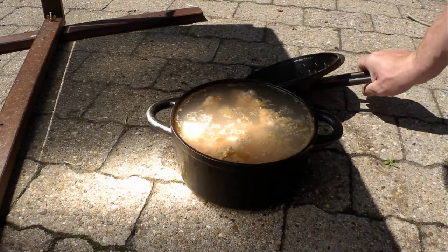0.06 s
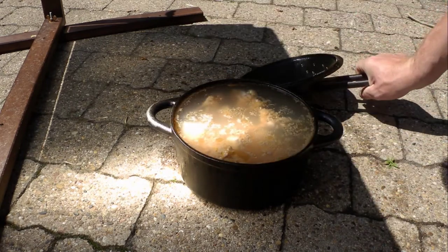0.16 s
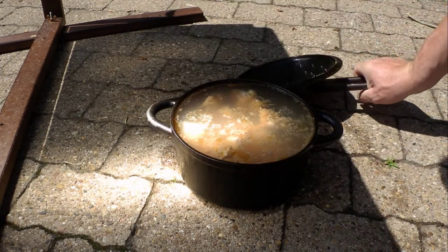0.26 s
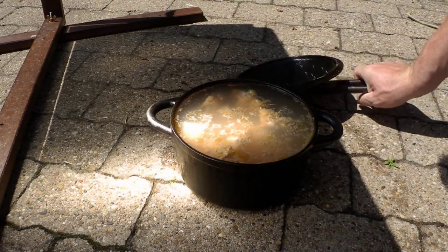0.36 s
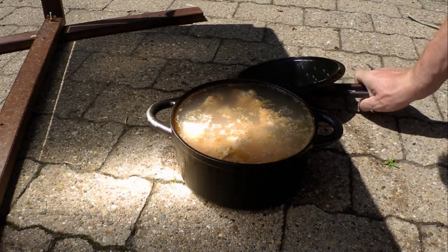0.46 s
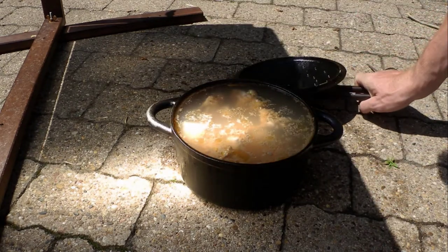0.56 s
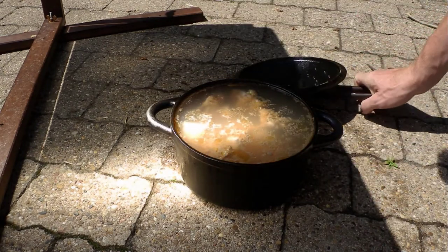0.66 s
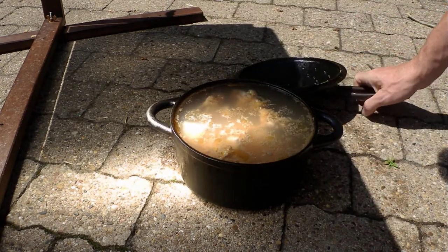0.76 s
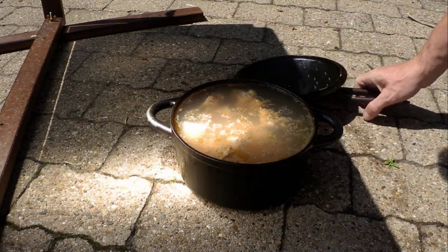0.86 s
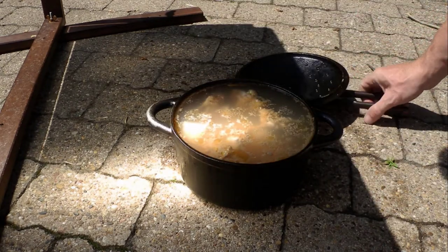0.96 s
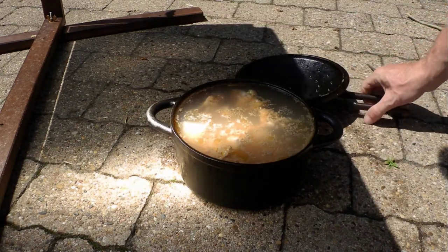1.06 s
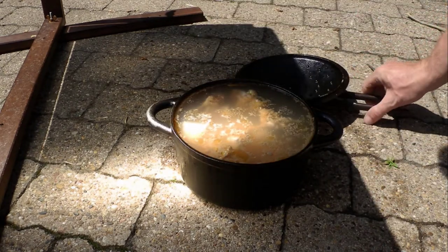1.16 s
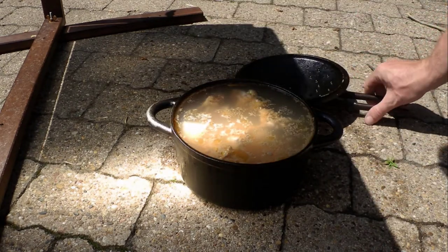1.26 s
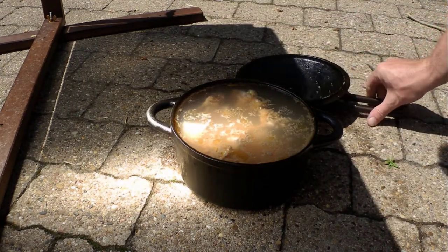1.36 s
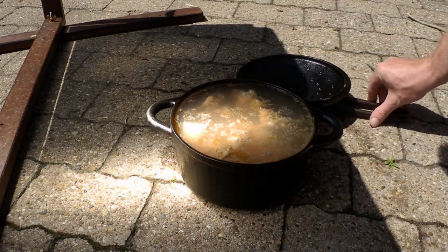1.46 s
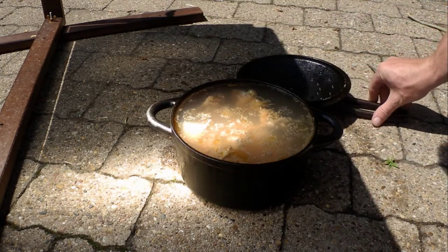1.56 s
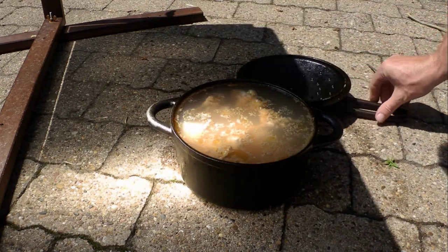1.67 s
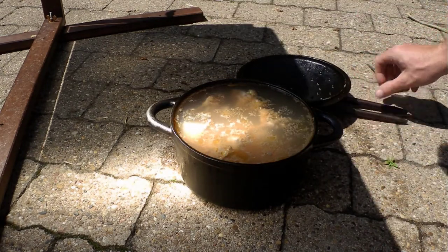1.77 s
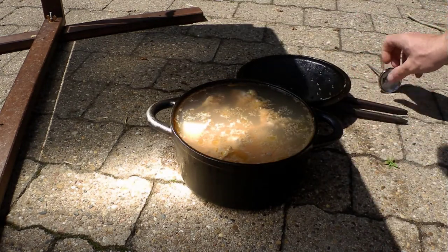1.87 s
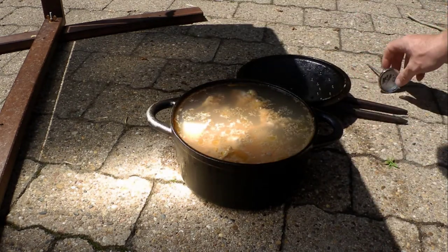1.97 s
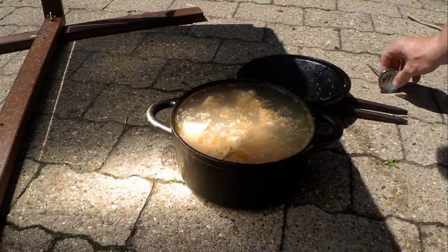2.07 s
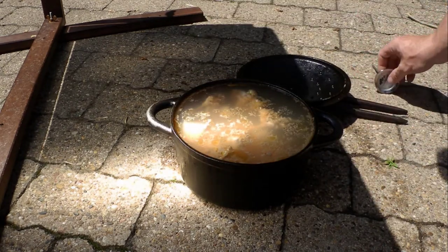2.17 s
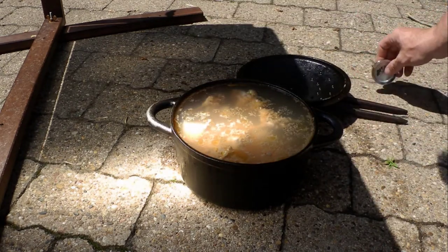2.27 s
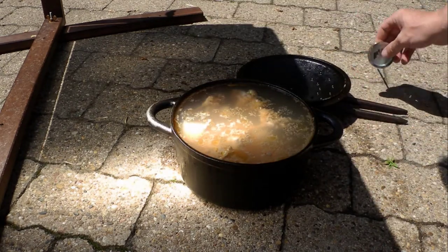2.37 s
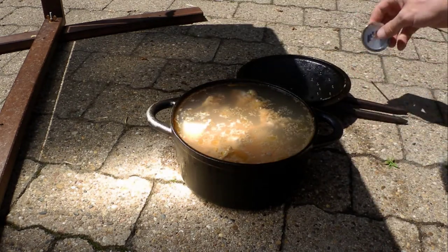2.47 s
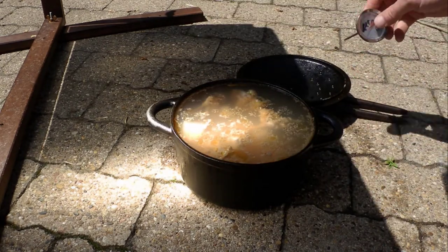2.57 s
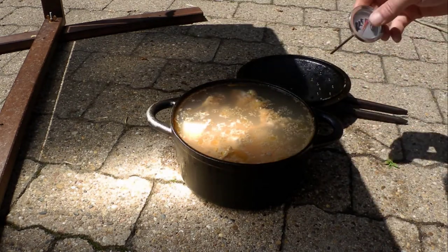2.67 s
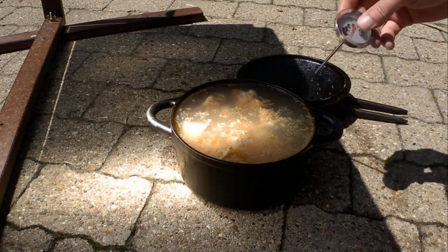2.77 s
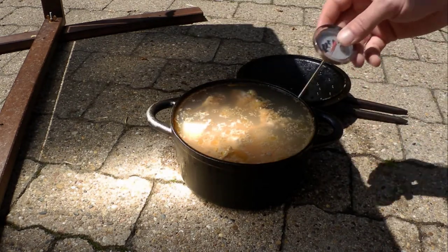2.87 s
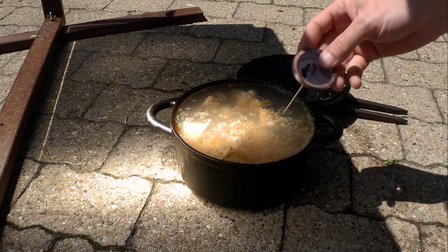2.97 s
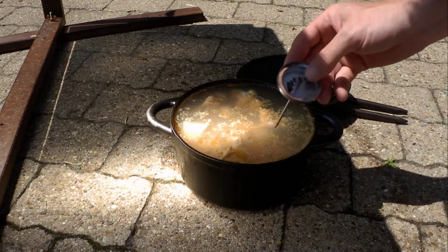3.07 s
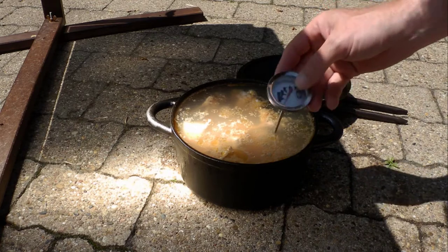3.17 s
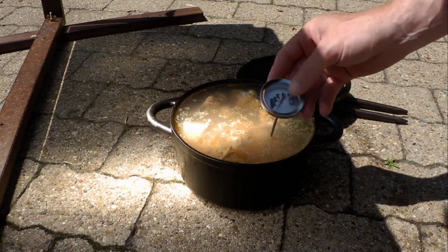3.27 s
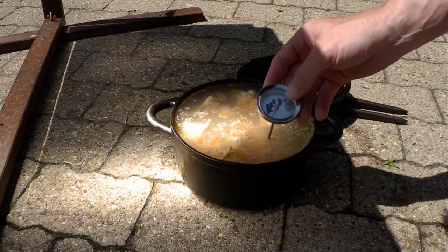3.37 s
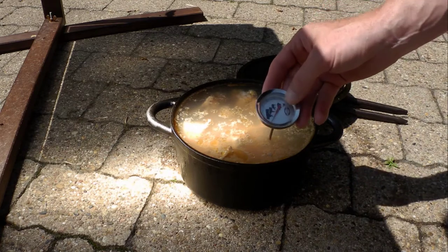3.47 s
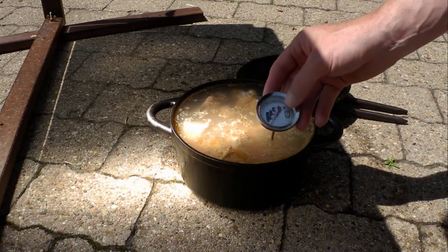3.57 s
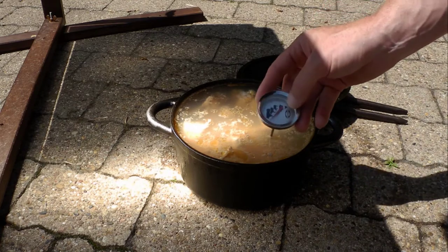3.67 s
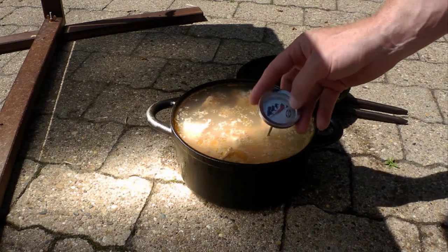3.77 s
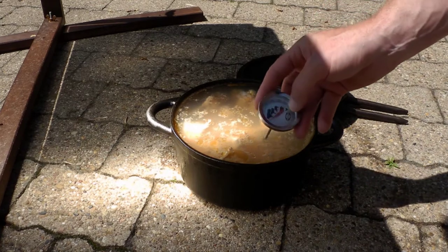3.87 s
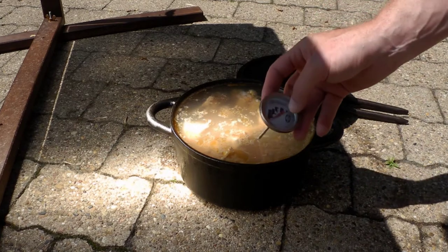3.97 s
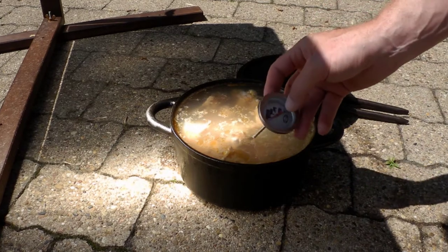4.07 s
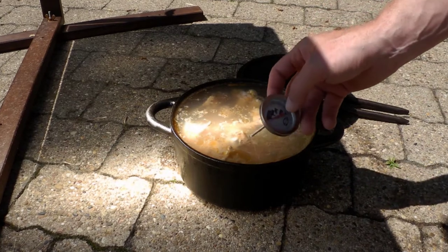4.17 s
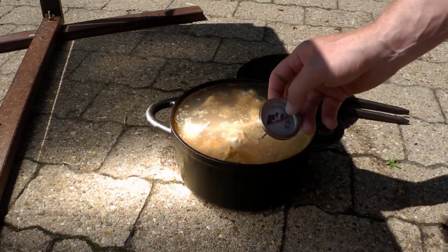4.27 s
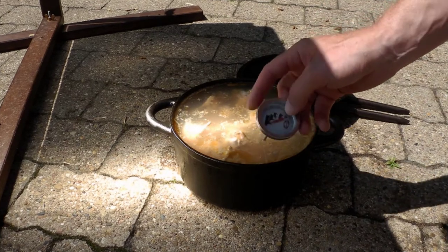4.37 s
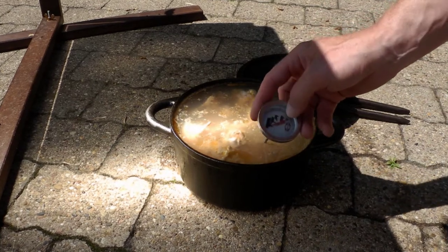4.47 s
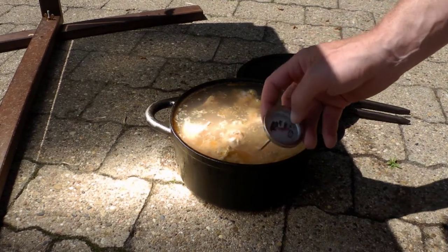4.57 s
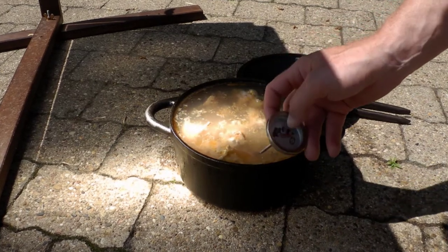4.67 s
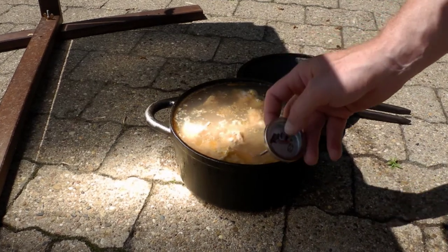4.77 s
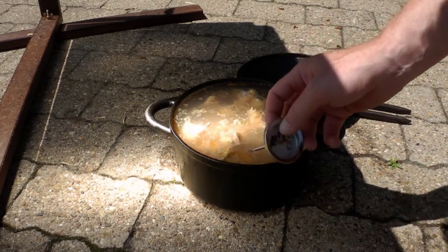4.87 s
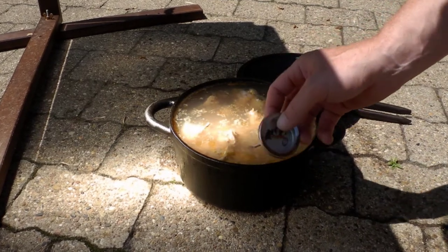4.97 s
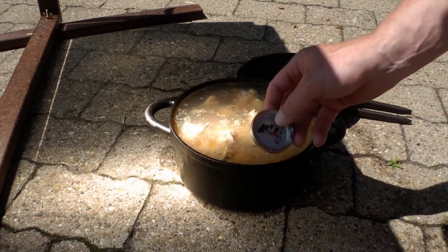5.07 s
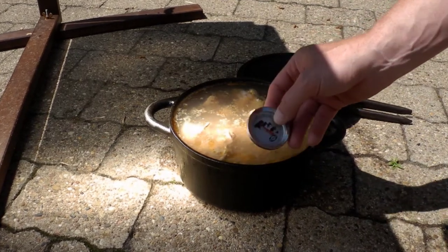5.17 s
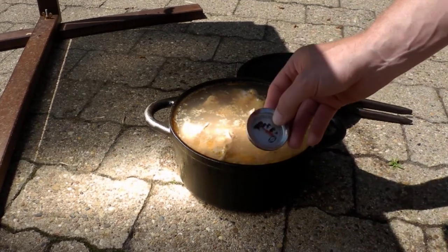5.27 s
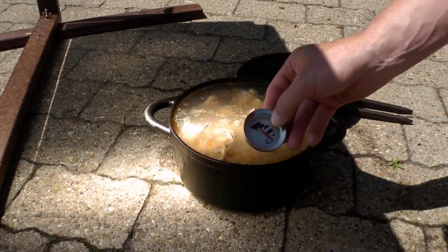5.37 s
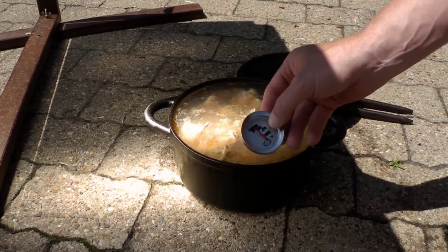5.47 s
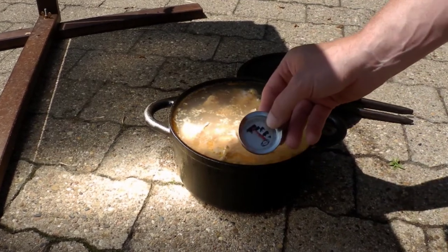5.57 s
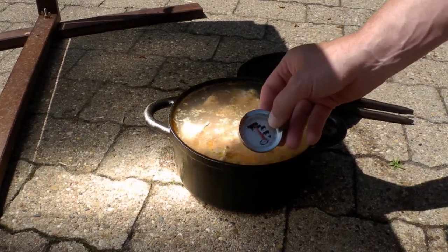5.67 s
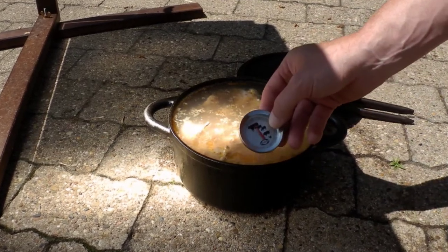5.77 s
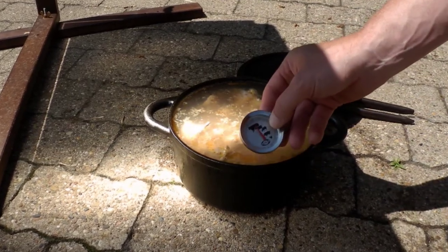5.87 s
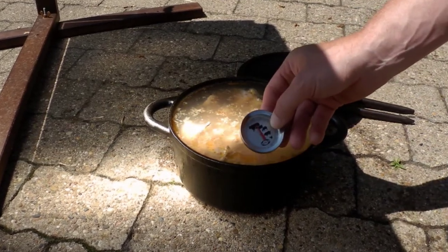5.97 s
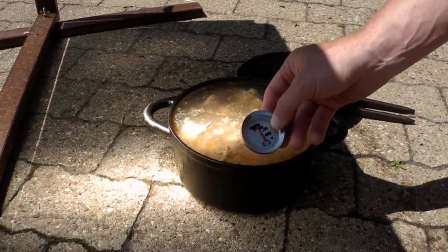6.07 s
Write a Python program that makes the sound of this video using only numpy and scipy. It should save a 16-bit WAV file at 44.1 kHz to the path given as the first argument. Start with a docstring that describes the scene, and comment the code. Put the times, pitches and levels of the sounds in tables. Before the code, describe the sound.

In a quiet yard, a pan's hollow knock and short scrape come first, followed by faint contacts and a hard ringing slap onto paving. A tight jingling chatter of a small metal case comes next, then delicate high taps and singing steel scrapes on a pot. Distant bird notes recur throughout. Stereo, close microphone, with steady low rumble, hiss that swells with the handling, and automatic level dips.

```python
"""Pan, pot and thermometer on paving

Outdoors, a metal pan is set down on paving beside a cooking pot: it knocks, scrapes and drops flat.
Struck metal is a sum of decaying modes with a noise burst at each contact; friction is many tiny slips.
A dial thermometer is picked up with a rattle, then its steel probe taps and slides on the pot's rim.
A small bird, made of gliding sines with a scattered tail, sings far off over rumble, hum and a hiss that
sinks and swells with the handling; grit snaps and soft low bumps are heard too.
A gain control ducks the sound when its treble is loud."""
import sys
import numpy as np
from scipy import signal
from scipy.fft import rfft, irfft, next_fast_len
from scipy.io import wavfile
from scipy.ndimage import uniform_filter1d, minimum_filter1d, map_coordinates

SR = 44100
rng = np.random.default_rng(int(sys.argv[2]) if len(sys.argv) > 2 else 0)


def put_to_file(sound):
    """Save the sound as 16-bit audio at rate SR, in the file named by the first command-line argument."""
    columns = np.atleast_2d(sound).T  # one column per channel
    safe = np.clip(columns, -1, 1)
    whole_steps = np.round(safe * 32767)
    wavfile.write(sys.argv[1], SR, whole_steps.astype(np.int16))


N = 269451
TIME = np.arange(N) / SR  # s
AGE = TIME[:SR // 2]  # time since a blow, s


def amp(db):
    """Logarithmic level: decibels to gain."""
    return 10 ** (np.asarray(db) / 20)


def unit(x):
    """Normalised power: x at rms 1."""
    return x / np.sqrt(np.mean(x ** 2) + 1e-20)


def unit_attack(x):
    """Onset loudness: a blow whose first hundredth of a second has rms 1."""
    return x / np.sqrt(np.mean(x[..., :SR // 100] ** 2))


def along(points, hz):
    """Logarithmic frequency scale: (Hz, value) points joined by straight lines on it."""
    f, v = np.transpose(points)
    return np.interp(np.log(hz + 1), np.log(f), v)


def level(rows):
    """Level envelope: gain per sample from (s, dB) rows."""
    return amp(np.interp(TIME, *np.transpose(rows)))


def wobble(rate):
    """Slow random modulation: a smooth curve through rate random knots a second."""
    knots = rng.standard_normal(int(N * rate / SR) + 4)
    return map_coordinates(knots, [TIME * rate])


def filtered(x, response):
    """Linear filtering: the spectrum of x times a response of frequency."""
    n = x.shape[-1]
    padded = next_fast_len(n + SR // 10)
    hz = np.fft.rfftfreq(padded, 1 / SR)
    return irfft(rfft(x, padded) * response(hz), padded)[..., :n]


def add(track, s, sound):
    """Superposition: mix a sound into a track at time s."""
    part = track[:, round(s * SR):][:, :sound.shape[-1]]
    part += sound[..., :part.shape[-1]]


def noise(spectrum, alike, size):
    """Partial coherence: coloured stereo noise of rms 1 whose mid and side shares set left-right likeness."""
    def mid_and_side(hz):
        angle = np.arccos(np.clip(along(alike, hz), -1, 1)) / 2
        return amp(along(spectrum, hz)) * [np.cos(angle), np.sin(angle)]

    mid, side = filtered(rng.standard_normal((2, size)), mid_and_side)
    return unit(np.array([mid + side, mid - side]))


def ringer(modes, lead, spread, scatter_db):
    """Modal vibration: each call rings an object's modes anew, each reaching the two ports out of step."""
    hz, db, t60 = np.transpose(modes)
    decays = amp(-60 * AGE / t60[:, None]) * np.exp(2j * np.pi * hz[:, None] * AGE)

    def ring():
        """Free decay: one blow's ring, roughened at the start by chatter."""
        port_phase = np.array([[.5], [-.5]]) * rng.normal(lead, spread, len(hz))
        phase = rng.uniform(0, 2 * np.pi, len(hz)) + port_phase
        strength = amp(db + scatter_db * rng.standard_normal((2, len(hz))))
        tones = np.einsum("cm,mt->ct", strength * np.exp(1j * phase), decays).real
        knots = AGE[::100]
        buzz = np.interp(AGE, knots, rng.standard_normal(len(knots)))
        # chatter against the support roughens the start of the ring
        chatter = .4 * np.exp(-AGE / .012)
        return unit_attack(tones * (1 + buzz * chatter))
    return ring


def crack(spectrum, t60, alike, tail_db, tail_t60, attack_s=0.0012):
    """Broadband impact: the burst of a hard contact and its faint scatter from the yard."""
    burst = noise(spectrum, [(1000, alike)], len(AGE)) * amp(-60 * AGE / t60)
    scatter = noise(spectrum, [(1000, .1)], len(AGE)) * amp(tail_db - 60 * AGE / tail_t60)
    return unit_attack((burst + scatter) * (1 - np.exp(-AGE / attack_s)))


def contact(x, hz, sharpness):
    """Contact stiffness: a springy contact favours its own resonance and passes little above it."""
    w = 2 * np.tan(np.pi * min(hz, SR / 2 - 1000) / SR)
    b, a = signal.bilinear([w * w], [1, w / sharpness, w * w])
    return signal.lfilter(b, a, x)


def stroke(s, rise, hold, fade_db):
    """Contact force envelope: one push rises, holds, then fades by fade_db a second."""
    attack = np.clip((TIME - s) / max(rise, 1 / SR), 0, 1)
    return attack * amp(-abs(fade_db) * np.maximum(TIME - s - rise - hold, 0))


def rub(pressure, ring, rate, grain_db, damping_db):
    """Stick-slip friction: tiny uneven slips, rate a second, excite modes that the contact damps."""
    spurts = amp(grain_db * np.tanh(wobble(40)))
    slips = (rng.random(N) < rate / SR) * rng.standard_normal(N) * spurts
    force = unit(slips) * pressure
    body = ring() * amp(-abs(damping_db) * AGE)
    return signal.fftconvolve(force[None], body / np.linalg.norm(body[0]), axes=1)[:, :N]


def lagged(x, lag):
    """Interaural-style delay: a sound from the right reaches the left port lag seconds later."""
    return filtered(x, lambda hz: np.exp(1j * np.pi * hz * lag * np.array([[-1], [1]])))


# Spectrum of the far outdoors. Each row: frequency in Hz, relative level in dB.
RUMBLE_COLOUR = [(15, -14), (33, -17), (54, 0.5), (75, -4.5), (190, -9.5), (400, -16.5), (600, -22),
                 (750, -20), (1920, -36.5), (2600, -41.5), (3400, -85)]
# Level of the rumble before its flutter and lean. Each row: time in seconds, level in dB.
RUMBLE_LEVEL = [(0, -44), (1.2, -43.5), (2.0, -45.5), (2.35, -43), (2.8, -43.5), (4.3, -45.5), (5.15, -43),
                (6.1, -45.5)]
# Coherence of the two ports. Each row: frequency in Hz, left-right likeness from 0 to 1.
LIKENESS = [(60, 0.85), (130, 0.96), (290, 0.82), (640, 0.63), (1410, 0.48), (3100, 0.039), (6820, 0.15),
            (15000, 1)]
# Spectrum of the hiss. Each row: frequency in Hz, relative level in dB.
HISS_COLOUR = [(1200, -41), (2500, 1.5), (4500, 7.5), (6500, 2.5), (9000, 5.5), (12000, 4), (15700, 1.5)]
# Level of the hiss and bright scrape noise: sinks after the pan's drop, swells as the probe rubs.
# Each row: time in seconds, level in dB, to which HISS_DB is added.
HISS_LEVEL = [(0.0, -54.5), (0.73, -58), (1.12, -52), (1.67, -66), (2.09, -65), (2.21, -58), (3.27, -52.5),
              (3.5, -58.5), (4.99, -54.5), (5.11, -49.5), (5.65, -56.5), (6.11, -59.5)]
HISS_DB = 2
HUM_HZ, HUM_DB = 52.6, -45.5  # centre pitch and level, both wavering


def background():
    """Ambient noise: rumble, frequency-modulated hum, light wind, a hiss that sinks and swells with the handling."""
    rumble = noise(RUMBLE_COLOUR, LIKENESS, N) * level(RUMBLE_LEVEL) * amp(0.2 * wobble(5.07))
    hum_hz = HUM_HZ + 2.26 * wobble(20)
    hum = np.sin(2 * np.pi * np.cumsum(hum_hz) / SR) * amp(HUM_DB + 0.69 * wobble(22.5))
    breeze_colour = [(15, 7), (60, -6), (200, 9), (600, -49), (1500, -120)]  # Hz, dB
    breeze = noise(breeze_colour, [(100, 0)], N) * amp(-66.0 + 3.7 * wobble(6.7))
    hiss = noise(HISS_COLOUR, LIKENESS, N) * level(HISS_LEVEL) * amp(HISS_DB)
    lean = amp([[.9], [-.9]])  # left, right
    return (rumble + hum) * lean + breeze + hiss


# Blows of the pan on the paving. Each row: start in seconds, push of air in dB, wall ring in dB,
# contact resonance in Hz, damping by the stone in dB/s.
PAN_HITS = [(.0597, -5, -26, 3620, 30), (0.082, -50, -39.5, 9100, 200), (.212, -19.5, -42, 3140, 50),
            (.460, -66, -38.5, 8000, 209), (.917, -29.5, -51.5, 7200, 300), (0.929, -38, -44.5, 3670, 300),
            (.952, -45, -49.5, 5500, 300), (1.2305, -46, -55, 10000, 400), (1.4825, -22.5, -33, 1980, 510),
            (1.489, -0.5, -19.5, 11000, 949), (1.4915, -29, -6.5, 5400, 653.5),
            (1.496, -32, -13, 5900, 800), (1.501, -23, -22.5, 8000, 10)]
# Modes of the pan's wall, before damping. Each row: frequency in Hz, relative level in dB, t60 in seconds.
WALL_MODES = [(2720, -6, .06), (2900, -8, .14), (3150, -8, .13), (3745, -3, .18), (3919, 0, .18),
              (4510, -7, .2), (4651, -10, .13), (4856, -11, .15), (5562, -2, .14), (5665, 0, .19),
              (5850, -7, .17), (6164, -12, .11), (6480, -13, .14), (7065, -5, .14), (7260, -10, .12),
              (8200, -11, .13), (8366, -10, .16), (8670, -6, .11), (8866, -5, .14), (10050, -7, .08),
              (10400, -10, .1), (11400, -15, .1), (11900, -7, .17), (14450, -14, .15)]
# Modes of its flat bottom, before damping. Each row: frequency in Hz, relative level in dB, t60 in seconds.
BOTTOM_MODES = [(160, -9, .15), (330, -9, .14), (522, -11, .09), (740, -3, .05), (880, 5, .08),
                (1080, -5, .06), (1340, -2, .17), (1440, -11, .08)]
# Spectrum of metal cracking on stone. Each row: frequency in Hz, relative level in dB.
PAN_CRACK = [(200, -22), (800, -12), (2000, -12), (4000, 8), (8000, 6), (16000, -1)]
# Drags of the pan's edge. Each row: start in seconds, length of the hold in seconds, level in dB.
DRAGS = [(.166, 0.028, -30.5), (0.191, 0.0057, -25.5), (0.457, 0.0048, -41)]
# Spectrum of the edge rasping on stone. Each row: frequency in Hz, relative level in dB.
DRAG_RASP = [(2000, -30), (5000, -8), (6000, 6), (7700, -10), (8900, 12), (10000, -20), (15000, -24)]
PUSH_S = 0.00026  # time scale of the swing of air under the pan
BOTTOM_DB, BOTTOM_GROWS = -14.5, 0.69  # bottom's ring at a blow of 0 dB; its dB per dB of blow
SETTLE_S, LASTING = 0.021, 0.19  # the bottom's ring drops quickly to a lasting share
PAN_CRACK_DB = 1  # against the mean dB of bottom and wall
DRAG_ATTACK_S, DRAG_FADE_DB_PER_S = 0.0013, 896.5
DRAG_WALL_DB, DRAG_BOTTOM_DB, DRAG_RASP_DB = -8, -6, -5.5  # against the drag's level
PAN_LAG_S = 4e-5  # the left port hears the pan later


def pan():
    """Impact and friction: blows push air, ring bottom and wall and crack on stone; the edge also drags."""
    out = np.zeros((2, N))
    wall = ringer(WALL_MODES, lead=0, spread=1.0, scatter_db=0.0)
    bottom = ringer(BOTTOM_MODES, lead=.2, spread=.3, scatter_db=1)
    u = (AGE - .0011) / PUSH_S
    push = -u * np.exp((1 - u ** 2) / 2)  # one swing of air, out and back
    settling = LASTING + (1 - LASTING) * np.exp(-AGE / SETTLE_S)
    echo_colour = [(60, -16), (140, 5), (320, 4), (550, -1), (1000, 0), (1450, -2), (1850, -30)]  # Hz, dB
    for s, blow_db, wall_db, contact_hz, damping_db in PAN_HITS:
        bottom_db = BOTTOM_DB + BOTTOM_GROWS * blow_db
        crack_db = PAN_CRACK_DB + (bottom_db + wall_db) / 2
        damped = amp(-damping_db * AGE)
        echo = noise(echo_colour, [(1000, .75)], len(AGE)) * amp(-60 * AGE / .6)
        low_ring = (bottom() * settling + amp(-11) * echo) * damped
        knock = amp(blow_db) * push + amp(bottom_db) * low_ring
        burst = crack(PAN_CRACK, t60=.013, alike=.5, tail_db=-27, tail_t60=.17, attack_s=.0004)
        metal = amp(wall_db) * wall() * damped + amp(crack_db) * burst
        add(out, s, knock + contact(metal, contact_hz, sharpness=1.5))
    pressure = sum(amp(db) * stroke(s, DRAG_ATTACK_S, length, DRAG_FADE_DB_PER_S)
                   for s, length, db in DRAGS)
    out += amp(DRAG_WALL_DB) * rub(pressure, wall, rate=2500, grain_db=-6, damping_db=300)
    out += amp(DRAG_BOTTOM_DB) * rub(pressure, bottom, rate=2500, grain_db=7.5, damping_db=200)
    out += amp(DRAG_RASP_DB) * pressure * noise(DRAG_RASP, [(1000, 0.3)], N)
    return lagged(out, PAN_LAG_S) * amp([[.6], [-.6]])  # leans to the left


# The bird's three syllables, one list each. Each row: time into the note in seconds,
# pitch in Hz before detuning and quaver, relative level in dB.
SYLLABLES = [
    [(0, 4600, -12), (.012, 5100, 0), (.028, 4700, -3), (.042, 3600, -25), (.058, 3400, -4),
     (.074, 4100, 0), (.088, 3200, -10)],
    [(0, 5200, -14), (.02, 4600, -9), (.035, 3900, -3), (.048, 4200, 0), (.064, 3450, 1), (.085, 2800, -12)],
    [(0, 4500, -8), (.02, 4100, -1), (.045, 3300, -2), (.07, 3100, 1), (.1, 3000, -3), (.13, 3100, -12)],
]
# Its notes, one list for each syllable. Each row: start in seconds, level in dB before the two gains below.
SONG = [
    [(.295, -33.5), (1.693, -33), (2.938, -33), (4.217, -31), (5.385, -31.5)],
    [(1.125, -39.5), (2.33, -34), (3.62, -39), (4.83, -33), (6.02, -35.5)],
    [(1.01, -42.5), (2.66, -33.5), (4.04, -38.5)],
]
# Depth of each syllable's pitch quaver, one value each, as a share of the pitch.
QUAVER = [0.041, 0.063, 0.081]
BIRD_DIRECT, BIRD_SCATTER = 0.2, 0.23  # gains of the straight and the scattered sound


def bird():
    """Frequency modulation and scattering: quavering glides, blurred by walls and trees on their long way."""
    out = np.zeros((2, N))
    tremble = wobble(600)
    for syllable, notes, depth in zip(SYLLABLES, SONG, QUAVER):
        t, hz, db = np.transpose(syllable)
        for s, note_db in notes:
            quaver = depth * np.roll(tremble, -round(s * SR))[:len(AGE)]
            detune = 0.0112 * rng.standard_normal()
            pitch = np.interp(AGE, t, hz) * (1 + detune + quaver)
            loudness = amp(note_db + np.interp(AGE, t, db, right=-120))
            add(out, s, loudness * np.sin(2 * np.pi * np.cumsum(pitch) / SR))
    tail = rng.standard_normal((2, len(AGE))) * amp(-60 * AGE / 0.5)
    scattered = signal.fftconvolve(out, tail / np.linalg.norm(tail[0]), axes=1)[:, :N]
    return BIRD_DIRECT * out + BIRD_SCATTER * scattered


# Snaps of grit on the paving. Each row: start in seconds, level in dB.
GRIT = [(1.5595, -35), (1.7495, -39.5), (1.789, -29.5), (1.8153, -42), (2.4759, -52), (2.991, -47),
        (3.0516, -47)]
# Spectrum of a snap. Each row: frequency in Hz, relative level in dB.
GRIT_SNAP = [(500, -29), (3000, -9), (7000, 4.5), (11000, 20.5), (16000, 3.5)]


def grit():
    """Broadband impact: sand grains snap, short and bright."""
    out = np.zeros((2, N))
    for s, db in GRIT:
        snap = crack(GRIT_SNAP, t60=0.02, alike=0.16, tail_db=-33, tail_t60=0.29, attack_s=.0002)
        add(out, s, amp(db) * snap)
    return out


# Contacts of the thermometer with the stone. Each row: start in seconds, reference level in dB.
RATTLE = [(2.0584, -22), (2.1141, -14), (2.1214, -9), (2.1462, -15.5), (2.1576, -16), (2.1665, -5),
          (2.1756, -40), (2.193, -14), (2.2109, -21)]
# Modes of its dial case, before the grip. Each row: frequency in Hz, relative level in dB, t60 in seconds.
DIAL_MODES = [(1680, -22, .15), (3085, -13, .4), (4495, -6, .16), (4950, -8, .15), (6500, -7, .15),
              (7036, -2, .2), (7241, -7, .22), (7628, -3, .18), (8107, -5, .22), (9216, 1, .2),
              (9400, 2, .17), (9650, -4, .17), (10900, -10, .2), (13370, -2, .22), (13430, -5, .19),
              (14510, -10, .22)]
# Spectrum of the case ticking on stone. Each row: frequency in Hz, relative level in dB.
DIAL_CRACK = [(200, -7), (700, -6), (1500, -20), (2300, -34), (4500, 0.5), (7000, 4), (9500, 10.5),
              (11500, -4), (13300, 3.5), (16000, -9)]
RATTLE_RING_DB, RATTLE_CRACK_DB = -17.5, -15  # against the reference level
JITTER_SPAN_S, JITTER_DB = (2.128, 2.152), -17.5  # four more contacts while the case skids
GRIP_DB_PER_S = 134  # the fingers damp the case
DIAL_LAG_S = 5e-5  # the left port hears the case later


def thermometer():
    """Repeated impact: the dial case chatters on the stone as it is picked up."""
    out = np.zeros((2, N))
    case = ringer(DIAL_MODES, lead=0, spread=0.63, scatter_db=1)
    jitter = [(s, JITTER_DB) for s in rng.uniform(*JITTER_SPAN_S, size=4)]
    for s, db in list(RATTLE) + jitter:
        tick = crack(DIAL_CRACK, t60=0.017, alike=.6, tail_db=-28, tail_t60=0.55, attack_s=.0008)
        gripped_ring = amp(RATTLE_RING_DB - GRIP_DB_PER_S * AGE) * case()
        add(out, s, amp(db) * (gripped_ring + amp(RATTLE_CRACK_DB) * tick))
    return lagged(out, DIAL_LAG_S)


# Taps of the probe on the rim. Each row: start in seconds, tap in dB, lowest mode in dB, its t60 in seconds.
TAPS = [(3.6842, -46, -51, 0.17), (3.9553, -28.5, -32.5, 0.13), (4.2905, -40, -45, 0.12),
        (4.589, -25.5, -25, .14), (4.9779, -49, -46, .14), (5.109, -42, -6.5, 0.0091)]
# Modes of the probe against the rim, before damping. Each row: frequency in Hz, relative level in dB,
# t60 in seconds.
STEM_MODES = [(3004, 0, .5), (3090, -7, .12), (3560, -4, .4), (4170, -4, .5), (4743, -2, .54),
              (5012, -5, .6), (5286, -1, .6), (5819, -11, .4), (7250, -11, .2), (7790, -9, .25),
              (8250, -8, .2), (8947, -6, .45), (9033, -8, .3), (9485, -7, .3), (9674, -8, .3),
              (9851, -7, .3), (10345, -7, .27), (11520, -15, .3), (12730, -11, .15), (13170, -11, .25),
              (13560, -10, .25), (14476, -3, .2), (14707, 1, .2), (15400, -5, .08)]
# Spectrum of a tap's burst. Each row: frequency in Hz, relative level in dB.
PROBE_CRACK = [(400, -28), (1400, -11), (2200, -21), (3200, -10), (5000, -4.5), (6200, -11), (8500, 2.5),
               (11500, -9), (16000, -7.5)]
# Strokes of the probe along the rim. Each row: start in seconds, rise in seconds, hold in seconds, level in dB.
STROKES = [(3.21, 0.12, 0.013, -49.5), (3.681, 0.025, 0.022, -47.5), (3.961, 0.029, .02, -39.5),
           (4.267, .015, .01, -40.5), (4.604, 0.017, 0.013, -40.5), (4.765, 0.047, 0.021, -48.5),
           (4.973, .008, 0.026, -40.5), (5.097, 0.04, .08, -40)]
# Spectrum of steel rasping on steel. Each row: frequency in Hz, relative level in dB.
RASP = [(2000, -40), (3000, 0), (4800, 6), (6200, -2), (7500, 16), (9500, 20), (11500, 6), (13200, 16),
        (14700, 15), (16000, -8)]
TAP_RING_DB = -8  # the stem's ring against the tap
STROKE_FADE_DB_PER_S = 124
LINGER_DB, LINGER_FADE_DB_PER_S = -7.5, 53  # a light touch stays on after each stroke
SING_DB, RASP_DB, RASP_FLUTTER_DB = -2.5, -5, 1
STUTTER_PER_S, STUTTER_DB = 32, 3.5  # the stem catches and lets go
PROBE_LAG_S = 1.5e-5  # the left port hears the probe later


def probe():
    """Impact and stick-slip friction: the steel stem taps the rim and sings as it slides along it."""
    out = np.zeros((2, N))
    stem = ringer(STEM_MODES, lead=0, spread=0.69, scatter_db=0)
    low_tone = np.sin(2 * np.pi * STEM_MODES[0][0] * AGE) * (1 - np.exp(-AGE / 0.0019))
    for s, tap_db, low_db, low_t60 in TAPS:
        tick = crack(PROBE_CRACK, t60=.007, alike=.5, tail_db=-26, tail_t60=.15)
        low_mode = low_tone * amp(-60 * AGE / low_t60)  # dies fast when pressed on the rim
        damped_ring = amp(TAP_RING_DB - 240 * AGE) * stem()
        add(out, s, amp(tap_db) * (tick + damped_ring) + amp(low_db) * low_mode)
    pushes = []
    for s, rise, hold, db in STROKES:
        main = stroke(s, rise, hold, STROKE_FADE_DB_PER_S)
        linger = amp(LINGER_DB) * stroke(s, rise, hold, LINGER_FADE_DB_PER_S)
        pushes.append(amp(db) * np.maximum(main, linger))
    pressure = np.max(pushes, axis=0)
    stutter = amp(STUTTER_DB * wobble(STUTTER_PER_S))
    singing = rub(pressure, stem, rate=2500, grain_db=2.5, damping_db=94) * stutter
    flutter = amp(RASP_DB + RASP_FLUTTER_DB * wobble(70))
    rasp = noise(RASP, [(1000, 1.0)], N) * pressure * flutter
    return lagged(out + amp(SING_DB) * singing + rasp, PROBE_LAG_S)


# Soft low bumps. Each row: centre in seconds, level in dB, frequency in Hz,
# lean in dB, added on the left and taken from the right.
THUMPS = [(4.706, -35, 62, 14.5), (4.794, -27, 122, -11.5)]


def thumps():
    """Pressure pulse: soft single swings of low pressure, each a dip between two small rises."""
    out = np.zeros((2, N))
    for s, db, hz, lean_db in THUMPS:
        u = np.pi * hz * (TIME - s)
        out += amp([[db + lean_db], [db - lean_db]]) * (2 * u ** 2 - 1) * np.exp(-u ** 2)
    return out


def scene():
    """Superposition: everything in the yard."""
    return background() + pan() + bird() + grit() + thermometer() + probe() + thumps()


def gain_control(x, threshold_db, range_db, hold, release_db):
    """Dynamic range control: loud treble cuts the gain at once; it holds, then recovers release_db a second."""
    sensed = filtered(x, lambda hz: hz / np.hypot(hz, 2000))
    power = np.abs(uniform_filter1d(np.mean(sensed ** 2, axis=0), size=260))
    over = np.clip(10 * np.log10(power + 1e-12) - threshold_db, 0, range_db)
    span = 2 * int(hold * SR / 2) + 1
    held = -minimum_filter1d(-over, span, origin=span // 2)  # largest excess over the past span
    cut = np.maximum.accumulate(held + release_db * TIME) - release_db * TIME
    return x * amp(-cut)


TOP_HZ = 15900  # upper band limit


def record(dry):
    """Transducer chain: gain control, its own faint hiss and a steep band limit."""
    ducked = gain_control(dry, threshold_db=-19.5, range_db=9.5, hold=0.12, release_db=20.0)
    own_colour = [(1500, -20), (4000, -3), (9000, 0)]  # Hz, dB
    own_hiss = noise(own_colour, [(3000, .2), (12000, .95)], N) * amp(-59)
    return filtered(ducked + own_hiss, lambda hz: 1 / np.sqrt(1 + (hz / TOP_HZ) ** 160))


dry = scene()
out = record(dry)
put_to_file(out)
```